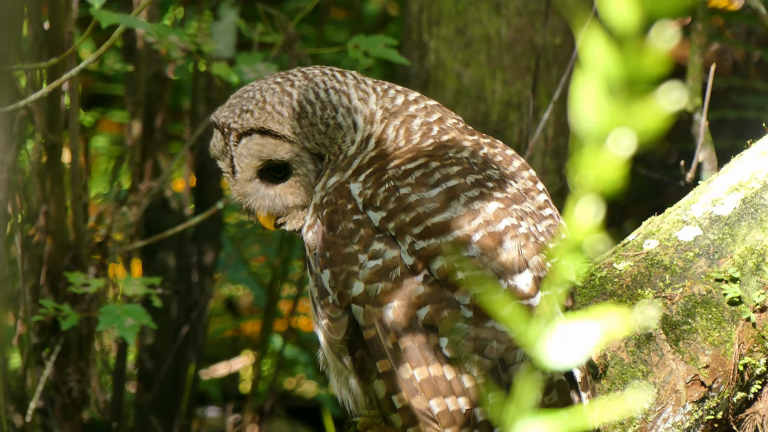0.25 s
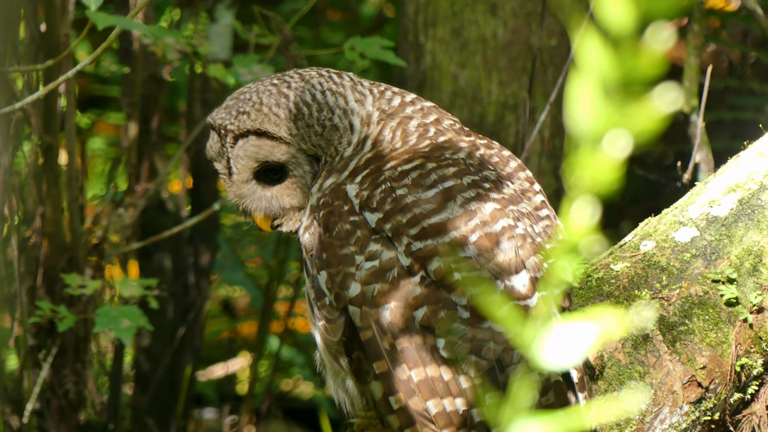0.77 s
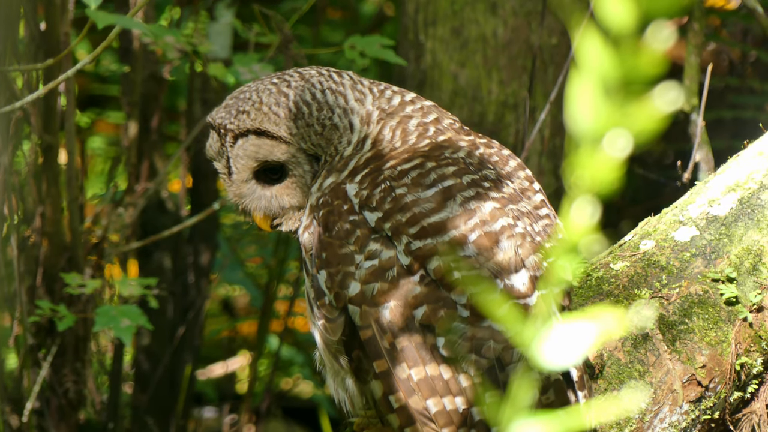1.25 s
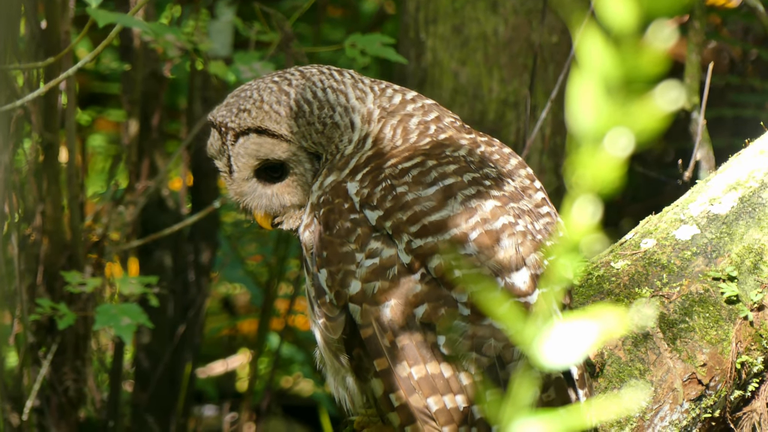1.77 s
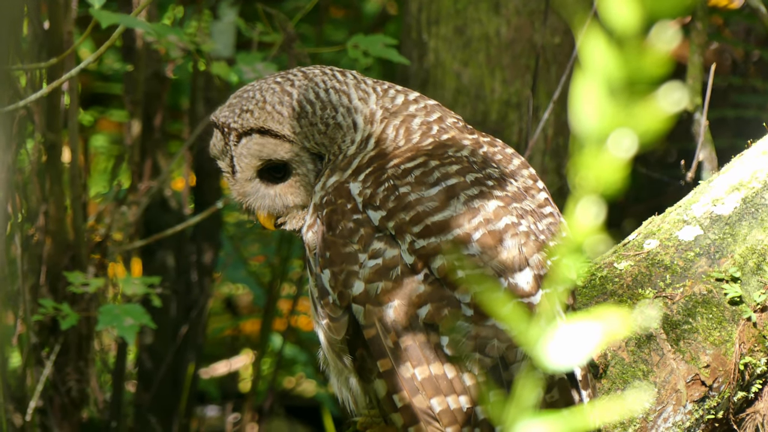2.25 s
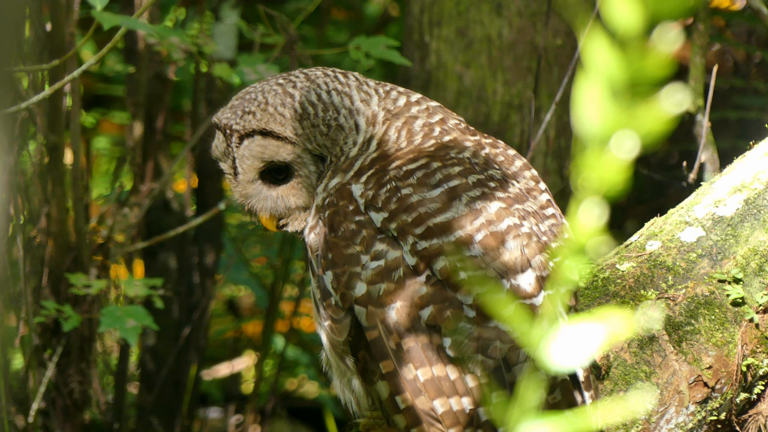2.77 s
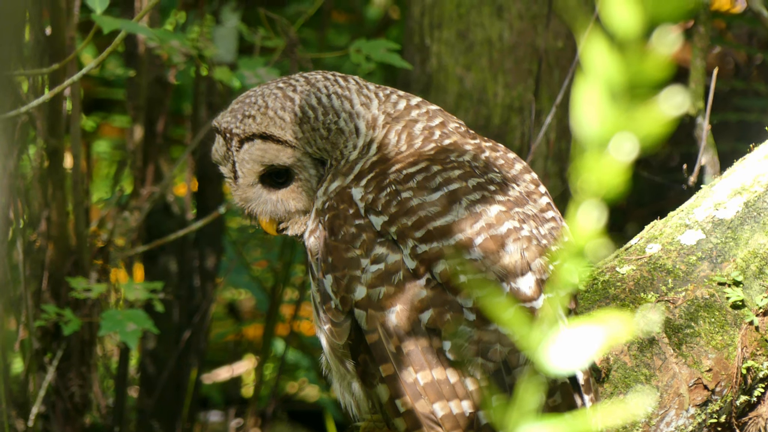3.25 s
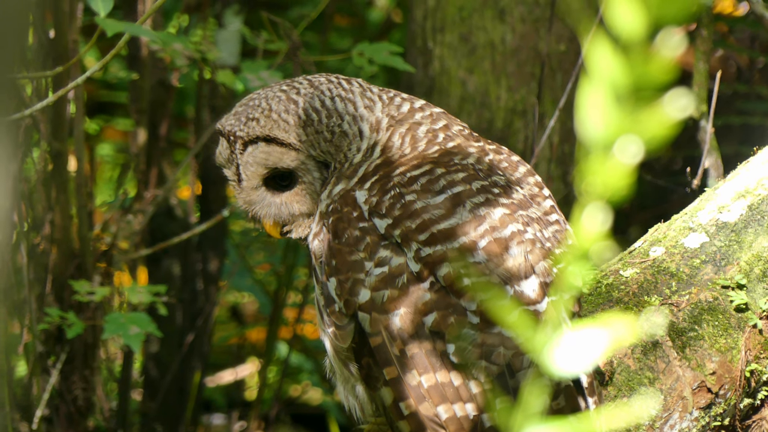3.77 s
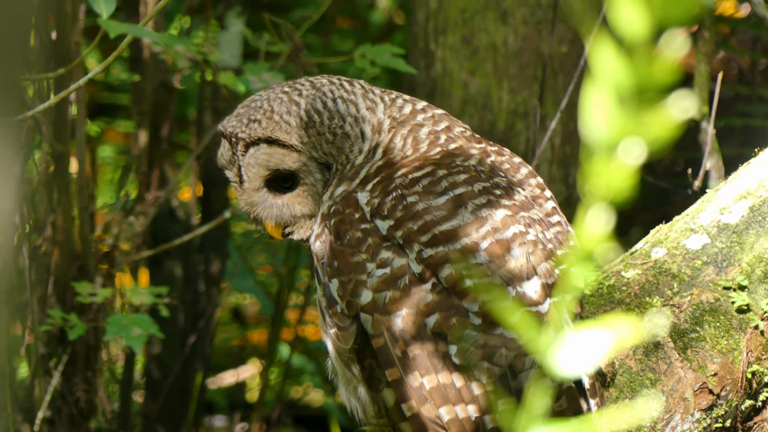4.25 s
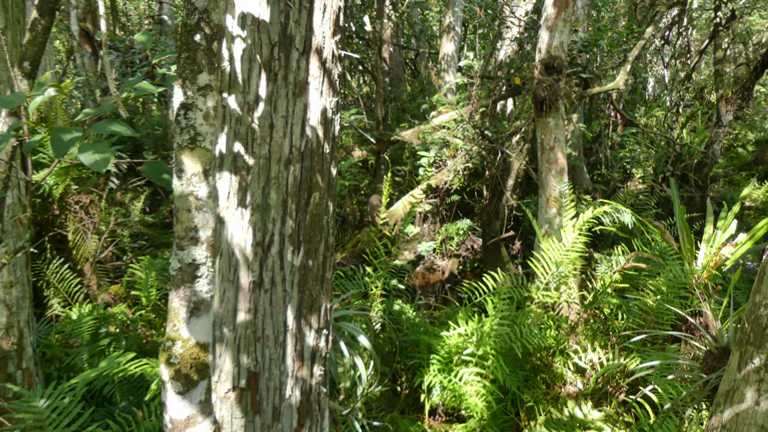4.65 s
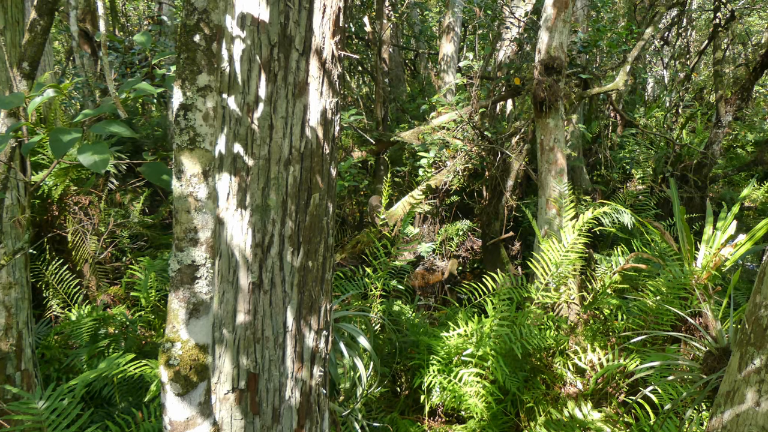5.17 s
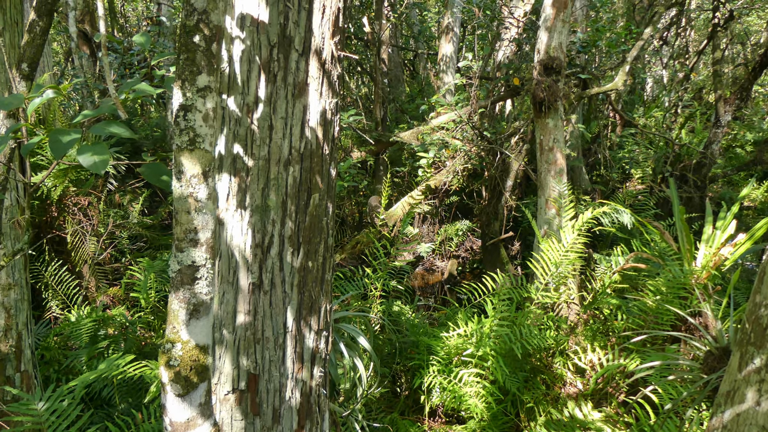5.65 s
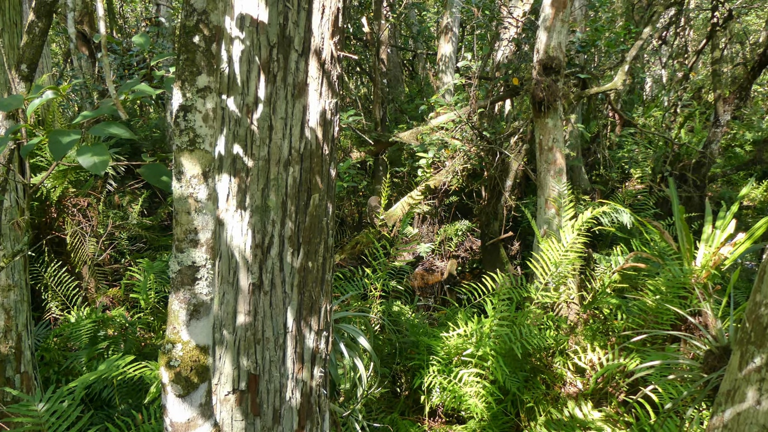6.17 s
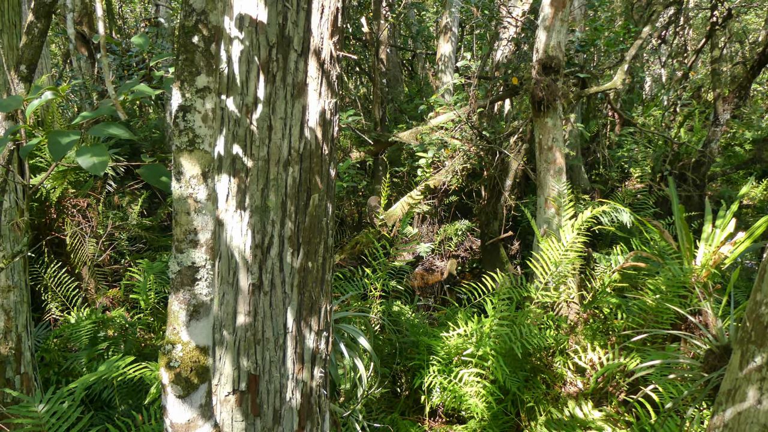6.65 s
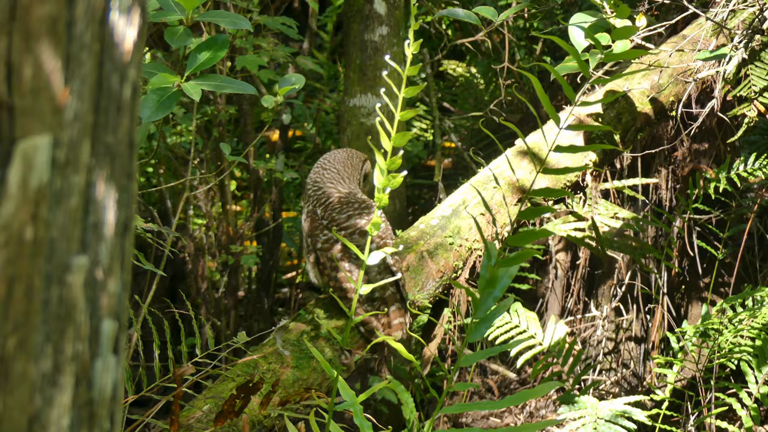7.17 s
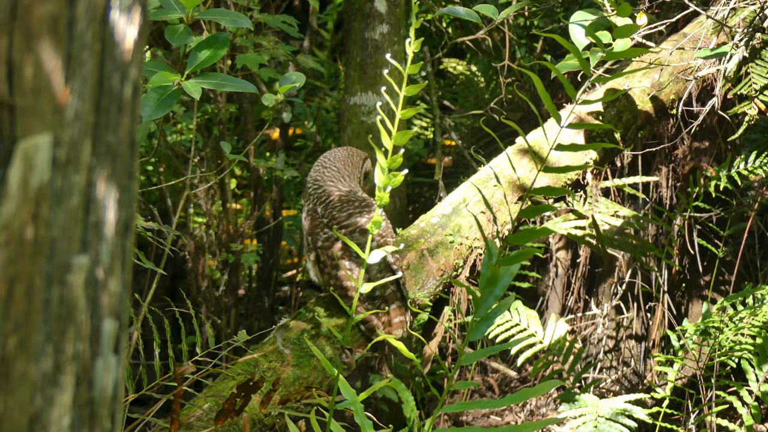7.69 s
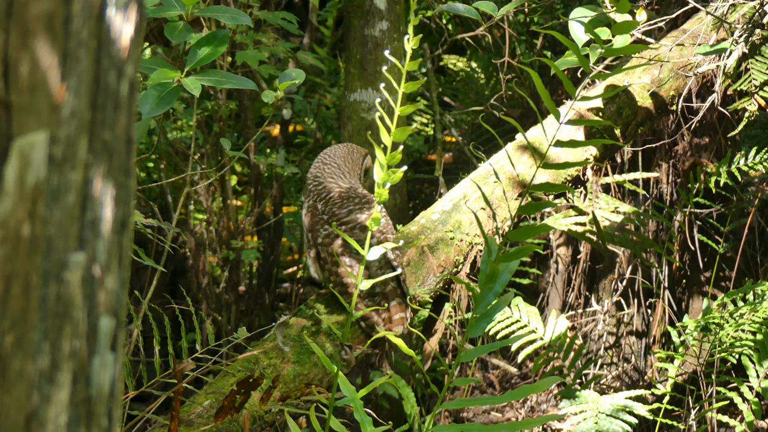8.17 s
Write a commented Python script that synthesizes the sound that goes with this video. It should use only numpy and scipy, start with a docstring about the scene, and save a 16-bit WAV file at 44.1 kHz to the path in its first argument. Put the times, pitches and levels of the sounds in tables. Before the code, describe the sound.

In a swamp forest by day, cicadas buzz loudly at first, then settle to a softer chorus with thin, pulsing cricket trills. A few brief, low frog grunts and two downward bird whistles come through in the first half. Later the bird returns with more slides and a quick run of short falling notes, lightly echoing. The microphone hears nearer insects in the centre, a blur of far ones behind, and a faint rumble of air.

```python
"""Buzzing cicadas come first: nine take turns over the blur of a far chorus, in a swamp forest by day.
Each buzz is a very fast run of clicks. Two crickets trill with their wings. A bird whistles long
downward slides and, near the end, quick hooked notes that echo among the trunks. A frog grunts low
now and then, a faint hum swells once, there is one short peep, and the air rumbles softly."""
import sys
import numpy as np
from scipy import signal
from scipy.io import wavfile
from scipy.ndimage import uniform_filter1d

SR = 44100
rng = np.random.default_rng(int(sys.argv[2]) if len(sys.argv) > 2 else 0)


def file_out(sig):
    """Save sig as 16-bit WAV at sys.argv[1]."""
    # one column per channel
    cols = np.atleast_2d(sig).T
    # limit, then scale
    lim = np.clip(cols, -1, 1)
    pcm = np.round(lim * 32767).astype(np.int16)
    wavfile.write(sys.argv[1], SR, pcm)


N = 371322
T = np.arange(N) / SR


def amp(db):
    return 10 ** (np.asarray(db) / 20)


def unit_power(x):
    return x / np.sqrt(np.mean(x ** 2) + 1e-20)


def add(mix, start_s, sound):
    part = mix[round(start_s * SR):][:len(sound)]
    part += sound[:len(part)]


def drift(n, top_hz):
    """A random wiggle about 1 in size: eight sine waves slower than top_hz."""
    t = np.arange(0, n + 64, 64) / SR
    waves = [np.sin(2 * np.pi * (f * t + rng.random())) for f in top_hz * rng.random(8)]
    return np.interp(np.arange(n) / SR, t, sum(waves) / 2)


def level_at(points, hz):
    """Joins (f/Hz, level/dB) points with straight lines on a scale of octaves."""
    f, db = np.transpose(points)
    return np.interp(np.log(hz + 1), np.log(f + 1), db)


def colour_db(points, hz):
    """How a sound is shared between low and high pitches: a column with total power 1."""
    db = level_at(points, hz)
    return (db - 10 * np.log10(np.sum(amp(db) ** 2)))[:, None]


# Tone colour of the rumble: f/Hz, level/dB. Levels in all tables are relative; gains follow.
RUMBLE_COLOUR = [(12, -36), (20, 10), (48, -2), (124, -4.5), (155, 0), (209, -4), (250, -9), (320, -45),
                 (550, -120)]
# Its rise and fall: t/s, level/dB
RUMBLE_LEVELS = [(0, -58.5), (1.9, -55.5), (3.6, -55), (5.0, -60.5), (7.0, -62.5), (8.42, -59.5)]

def rumble_db(t, hz):
    """The air rumbles, deep and faint."""
    return np.interp(t, *np.transpose(RUMBLE_LEVELS)) + colour_db(RUMBLE_COLOUR, hz)


# Tone colours of the highest insects and of the rustling air: f/Hz, level/dB
SIZZLE_COLOUR = [(5290, -21.5), (9000, -4.5), (9560, -7.5), (11200, -2.5), (13300, -9.5), (15100, -15),
                 (16000, -22)]
AIR_COLOUR = [(150, -43), (250, -1.5), (956, -8), (1050, -10), (1880, -11), (2080, -13.5), (3000, -12),
              (3900, -52), (6600, -120)]

def sizzle_and_air_db(swell_db, hz):
    """High insects sizzle and the air rustles; both gently follow the swell of the chorus."""
    return [-51 + .4 * swell_db + colour_db(SIZZLE_COLOUR, hz),
            -58 + .34 * swell_db + colour_db(AIR_COLOUR, hz)]


# The far chorus over time: t/s, level/dB, share of the quiet colour (0-1)
CHORUS_LEVELS = [(0.0, -33.5, 0.3), (1.33, -33.5, 0.35), (2.62, -32.5, 0.3), (3.14, -33.5, 0.24),
                 (3.73, -36.5, 0.27), (4.43, -39.5, 0.5), (5.07, -38.5, 0.6), (6.0, -39.5, 0.2),
                 (6.52, -39, 0.55), (6.8, -43, 0.4), (7.57, -41.5, 0), (7.81, -39.5, 0), (8.42, -37, 0.34)]
# Its tone colours when loud and when quiet: f/Hz, level/dB
LOUD_COLOUR = [(1530, -64), (2600, -35), (3080, -18), (3130, -16), (3670, -10), (4100, -7.5), (4520, -7),
               (4590, -4.5), (4920, -8.5), (5000, -3), (6660, -16), (8030, -8), (10000, -28.5),
               (13000, -60), (22000, -120)]
QUIET_COLOUR = [(1530, -56), (2600, -36), (3150, -38), (3330, -27), (3840, -13.5), (4810, 1), (6550, -14),
                (7170, -5.5), (7290, -16), (7720, 2.5), (8070, -1.5), (9290, -23.5), (10000, -32),
                (13000, -59), (22000, -120)]

def far_chorus_db(t, hz):
    """Far singers blur together; the colour shifts as the loud ones fall silent."""
    times, db, share = np.transpose(CHORUS_LEVELS)
    level, quiet = np.interp(t, times, db), np.interp(t, times, share)
    colour = (1 - quiet) * colour_db(LOUD_COLOUR, hz) + quiet * colour_db(QUIET_COLOUR, hz)
    return level + colour, level - level.mean()


# Stereo width: f/Hz, level/dB of the side (what differs between the ears) against the middle
STEREO_WIDTH = [(60, -18), (120, -19), (240, -16), (480, -15.5), (950, -11.5), (1890, -15.5), (3770, -18),
                (7520, -20), (15000, -8.5)]

def background(patchy_db=1.5, bands_db=2.5):
    """Noise, shaped in short slices into chorus, sizzle, air and rumble, with drifting patches."""
    slices, hz = N // 256 + 5, np.fft.rfftfreq(1024, 1 / SR)
    t = np.arange(slices) * 256 / SR
    mid_re, mid_im, side_re, side_im, patches, bands = rng.standard_normal((slices, 513, 6)).T
    bands = unit_power(uniform_filter1d(bands, 150, axis=1))  # far singers: thin, second-long bands
    patches = uniform_filter1d(patches, 8, axis=0)
    patches = unit_power(uniform_filter1d(patches, 30, axis=1))
    chorus_db, swell_db = far_chorus_db(t, hz)
    layers_db = [rumble_db(t, hz), *sizzle_and_air_db(swell_db, hz), chorus_db - 5 + bands_db * bands]
    gain = np.sqrt(sum(amp(db) ** 2 for db in layers_db)) * amp(patchy_db * patches + 2.5)
    mid = mid_re + 1j * mid_im
    side = amp(level_at(STEREO_WIDTH, hz))[:, None] * (side_re + 1j * side_im)
    spectra = gain * np.array([mid + side, mid - side])
    return signal.istft(spectra, nperseg=1024, noverlap=768)[1][:, :N]


def hum(hz=208, peak_s=3.5, fade_s=0.72, peak_db=-56, waver_db=2.0):
    """A faint low tone that swells once and wavers."""
    level = peak_db - 10 * ((T - peak_s) / fade_s) ** 2 + waver_db * drift(N, 14.0)
    pitch = hz * (1 + 0.025 * drift(N, 3.5))
    return amp(level) * np.cos(2 * np.pi * np.cumsum(pitch) / SR)


def trunk_echoes(sound, decay_s=0.75, echo_db=-3, width=0.09, sway_hz=4.0):
    """Trunks scatter sound into many fading echoes; two sets take turns as the leaves sway."""
    t = np.arange(SR // 2) / SR
    echoes = (rng.random((3, len(t))) < .05) * rng.standard_normal((3, len(t)))
    echoes *= amp(-60 * t / decay_s) * (t > .004)
    echoes *= amp(echo_db) / np.linalg.norm(echoes[0])
    first, second, side = signal.oaconvolve(sound[None], echoes, axes=1)[:, :N]
    sway = np.pi * drift(N, sway_hz)
    mid = first * np.cos(sway) + second * np.sin(sway)
    return np.array([mid + width * side, mid - width * side])


# One peep: t/s, then its tones as f/Hz, level/dB
PEEP_TONES = (5.678, [(1230, -47.5), (2460, -57), (3330, -50)])

def peep(fade_s=0.011):
    """Three brief, rough tones sound together."""
    out, t = np.zeros(N), np.arange(-.06, .06, 1 / SR)
    peak_s, tones = PEEP_TONES
    for hz, db in tones:
        tone = np.sin(2 * np.pi * hz * t) * (1 + .6 * drift(len(t), 250.))
        add(out, peak_s + t[0], amp(db) * np.exp(-(t / fade_s) ** 2) * tone)
    return out


# Frog grunts: t/s, level/dB, f/Hz
FROG_GRUNTS = [(0.331, -49, 152), (1.431, -37, 146), (2.897, -39.5, 128), (4.31, -41.5, 135),
               (4.76, -49, 150), (4.822, -48.5, 55)]

def frog(fade_cycles=1.46):
    """Each grunt is a few low vibrations that swell and fade as the pitch drops."""
    out, t = np.zeros(N), np.arange(-.06, .06, 1 / SR)
    for peak_s, db, hz in FROG_GRUNTS:
        tone = np.sin(2 * np.pi * hz * t * (1 - 9.8 * t))
        add(out, peak_s + t[0], amp(db) * np.exp(-(t * hz / fade_cycles) ** 2) * tone)
    return out


# Each cricket's pace: head start/strokes, rate/Hz, slowing/(strokes per s squared)
STROKE_PACE = [(-.08, 13.9, .008), (-.29, 14.66, .016)]
# Its loudness, one list a cricket: t/s, level/dB
CRICKET_LEVELS = [
    [(0, -60), (1.4, -50), (2.6, -62), (3.1, -54), (4.2, -49.5), (5.6, -44), (7.0, -48.5), (7.7, -44.5),
     (8.4, -45)],
    [(0, -46), (2.6, -50), (3.4, -46.5), (4.3, -51), (5.6, -47), (6.4, -50), (7.7, -46.5), (8.4, -46.5)],
]
# Its wings: f/Hz, slide as a share of the pitch, share of the time sounding, roughness (0-1)
CRICKET_WINGS = [(7525, -0.017, 0.33, 0.08), (7855, -0.0165, 0.27, 0.3)]

def crickets(uneven_db=1.0):
    """Each wing stroke is a short tone that sags a little in pitch."""
    out = np.zeros(N)
    for pace, levels, wings in zip(STROKE_PACE, CRICKET_LEVELS, CRICKET_WINGS):
        head_start, rate, slowing = pace
        hz, slide, sounding, rough = wings
        count = head_start + rate * T - slowing * T ** 2 + 0.021 * drift(N, 5.0) + 1.49
        place = (count % 1 - .5) / sounding  # a stroke runs from -0.5 to 0.5
        stroke_db = uneven_db * rng.standard_normal(130)[count.astype(int)]
        stroke = np.cos(np.pi * np.clip(place, -.5, .5)) * (1 + rough * drift(N, 400.))
        pitch = hz * (1 + slide * np.clip(place, -1, 1))
        tone = np.cos(2 * np.pi * np.cumsum(pitch) / SR)
        out += amp(np.interp(T, *np.transpose(levels)) + 11 + stroke_db) * stroke * tone
    return out


def whistle(points, husky=.15):
    """A slightly husky tone through (t/s, f/Hz, level/dB) points; gives its start time and sound."""
    times, hz, db = np.transpose(points)
    t = np.arange(times[0], times[-1], 1 / SR)
    hz, db = (uniform_filter1d(np.interp(t, times, curve), 90) for curve in (hz, db))  # round corners
    loudness = amp(db) * signal.windows.tukey(len(t), .15) * (1 + husky * drift(len(t), 300.))
    return times[0], np.sqrt(2) * loudness * np.sin(2 * np.pi * np.cumsum(hz) / SR)


# Long downward whistles, one list a slide: t/s, f/Hz, level/dB
BIRD_SLIDES = [
    [(1.7, 3008, -66), (1.732, 2850, -47.5), (1.86, 2065, -52), (1.898, 1815, -57.5), (2.03, 1660, -68)],
    [(2.3, 3850, -32), (2.335, 3350, -43), (2.38, 3090, -44), (2.434, 3144, -53), (2.472, 3050, -52),
     (2.51, 2790, -45), (2.596, 2270, -47.5), (2.668, 1820, -50), (2.73, 1678, -77)],
    [(6.34, 4600, -35), (6.375, 3780, -49), (6.42, 3120, -38), (6.52, 3110, -50), (6.545, 2940, -44),
     (6.574, 2900, -46.5), (6.64, 2270, -42), (6.69, 2263, -44), (6.715, 1930, -53), (6.73, 1890, -63)],
    [(7.0, 4500, -47), (7.03, 3650, -47), (7.056, 3206, -42), (7.11, 2944, -48), (7.174, 2952, -57.5),
     (7.24, 2480, -50), (7.28, 2185, -54.5), (7.31, 1742, -56), (7.38, 1255, -62)],
]
# Hooked notes flick up, rest briefly, then fall: t/s at the top, level/dB, rest f/Hz, fall level/dB
HOOKED_NOTES = [(6.992, -51.5, 1770, -2), (7.278, -49, 1803, -2.5), (7.573, -46, 1846, 1.5),
                (7.873, -44.5, 1867, -0.5), (8.174, -44, 1906, 1)]
# The flick: t/s from the top, f/Hz, added level/dB
FLICK_SHAPE = [(-.022, 2289, -1), (-.012, 2440, -5), (-.004, 2950, 2.5), (0, 3363, 7), (.004, 2600, 4),
               (.009, 2138, -3)]
# The rest and fall: t/s from the top, share of the rest pitch, added level/dB
FALL_SHAPE = [(.014, 1.02, -5), (.036, .98, -3.5), (.06, .82, -12), (0.089, .7, -11)]

def bird():
    """A bird whistles four long slides and five hooked notes that share one shape."""
    out = np.zeros(N)
    for slide in BIRD_SLIDES:
        add(out, *whistle(slide))
    for top_s, db, rest_hz, fall_db in HOOKED_NOTES:
        flick = [(top_s + t, hz, db + extra) for t, hz, extra in FLICK_SHAPE]
        fall = [(top_s + t, share * rest_hz, db + fall_db + extra) for t, share, extra in FALL_SHAPE]
        add(out, *whistle(flick + fall))
    return out


# One row a buzz; the last two are the first cicada again, as it turns.
# Start t/s, full t/s, fading t/s, gone t/s, level/dB when full, level/dB before the fade
BUZZ_SWELLS = [(-1, 0, 1.4, 2.35, -34.5, -33.5), (-1.5, 0.5, .9, 1.7, -37, -38.5),
               (-0.5, 0, 1.8, 3.1, -45, -40.5), (-1, 0, 2.82, 5.08, -40.5, -40),
               (0.6, 1.1, 2.15, 2.2, -34, -34.5), (4.5, 5, 5.34, 5.93, -44, -46),
               (4.5, 5.5, 6.44, 7.6, -45.5, -44.5), (7, 7.5, 9, 10, -42, -46), (7, 7.5, 9, 10, -47, -43),
               (1.36, 2.5, 2.7, 3.3, -30.5, -31.5), (2.5, 3, 3.39, 3.84, -35, -36.5)]
# Click rate of each buzz: f/Hz before, f/Hz after, t/s the change starts, t/s it ends
CLICK_RATES = [(249.43, 250.07, 1.8, 3.0), (283.61, 283.74, 0, 1.6), (261.69, 261.25, 0, 2.6),
               (271.9, 269.6, 0, 4.7), (285.07, 285.12, 0, 3.3), (273.98, 273.31, 5.0, 6.0),
               (277.03, 275.97, 4.7, 7.7), (265.92, 265.3, 7.55, 8.42), (271.52, 271.06, 6.9, 8.42),
               (249.43, 250.07, 1.8, 3.0), (250.07, 250.07, 0, 1)]
# Each buzz as heard through the trees: level/dB at 13, 14, ... 33 times its click rate
BUZZ_COLOURS = [ (-29.5, -21, -18, -13, -14, -22, -5.5, -14, -10.5, -25, -8, -32, -11.5, -26, -16, -21, -16.5, -23, -18, -13, -24),
                (-23, -14, -19, -12, -14, -3.5, -7, -13, -14, -18, -22, -26, -11, -24, -30, -17, -9.5, -21, -17, -29, -24),
                (-29, -4, -17, -10.5, -23, -11, -26, -8, -11, -13, -26, -18, -26, -25, -27, -17, -30, -16, -24, -18, -29),
                (-29, -12.5, -16, -5, -13, -7.5, -21, -6, -19, -25, -23, -10, -20.5, -20, -25, -23, -21, -23, -24, -24, -29),
                (-32, -29, -31, -29, -11, -14, -29, -29, -37, -15, -31, -14.5, -34, -29, -29, -27, -29, -27, -25, -35, -27),
                (-20, -24, -12.5, -10, -7, -2, -6.5, -13, -23, -11.5, -23, -15, -16, -20, -27, -30, -17, -22, -28, -24, -26),
                (-39, -12, -15, -4.5, -26, -7.5, -24, -9, -24, -23, -18, -14, -27, -14, -16, -4, -18, -10, -20, -28, -30),
                (-23, -12.5, -6, -12, -5, -19, -20, -16, -9, -29, -28, -21, -22, -15, -19, -12, -8, -10, -25, -23, -26),
                (-16, -17, -5.5, -25, -21, -30, -12, -15, -13, -28, -6.5, -18, -13, -18, -16, -20, -11, -18, -29, -28, -27),
                (-31, -26, -32, -15.5, -7.5, -26, -5, -16, -14, -15, -4, -31, -21, -26, -23, -30, -22, -28, -23, -31, -18),
                (-27, -30, -22, -15.5, -13, -3.5, -11.5, -16, -15, -13.5, -13.5, -26, -19, -21, -29, -25, -27, -24, -30, -27, -26),
                ]
# One cicada stresses every third click for a while: buzz number, from t/s, to t/s, strength
LIMPING_BUZZ = (5, 5.15, 5.75, .6)

def cicadas(waver_hz=3.52, waver=0.13, wobble_rad=0.5):
    """Drum-like skins click steadily, making evenly spaced tones; moving air and leaves make them waver."""
    out, offsets = np.zeros(N), rng.random(len(BUZZ_COLOURS[0]))
    limper, limp_from, limp_to, limp_strength = LIMPING_BUZZ
    for which, (swell, rate, colour) in enumerate(zip(BUZZ_SWELLS, CLICK_RATES, BUZZ_COLOURS)):
        *times, full_db, late_db = swell
        span = slice(round(max(times[0], 0) * SR), round(times[-1] * SR))
        t = T[span]
        clicks = np.cumsum(np.interp(T, rate[2:], rate[:2]))[span] / SR  # clicks so far
        buzz = np.zeros(len(t))
        for multiple, (db, offset) in enumerate(zip(colour, offsets), start=13):
            phase = 2 * np.pi * (multiple * clicks + offset) + wobble_rad * drift(len(t), 6.0)
            buzz += amp(db) * (1 + waver * drift(len(t), waver_hz)) * np.cos(phase)
        if which == limper:
            limp = limp_strength * np.clip(np.minimum(t - limp_from, limp_to - t) * 10, 0, 1)
            buzz *= 1 + 2 * limp * np.cos(2 * np.pi * clicks / 3)
        out[span] += np.sqrt(2) * np.interp(t, times, [0, amp(full_db), amp(late_db), 0]) * buzz
    return out


def scene():
    """Near singers sit in the middle; echoes and background spread to both sides."""
    song, trills, small_calls = bird(), crickets(), frog() + peep()
    near = cicadas() + trills + .72 * song + hum() + small_calls
    return near + trunk_echoes(song + 0.58 * trills + 0.69 * small_calls) + background()


def record(dry, cutoff_hz=15750):
    """Cuts away the very highest treble."""
    lowpass = signal.firwin(511, cutoff_hz, window=("kaiser", 9), fs=SR)
    return signal.oaconvolve(dry, lowpass[None], "same")


dry = scene()
out = record(dry)
file_out(out)
```